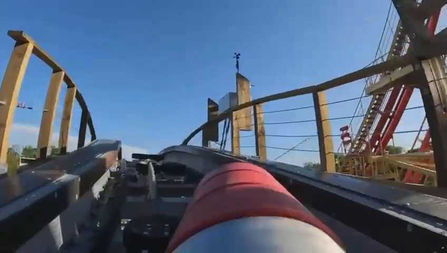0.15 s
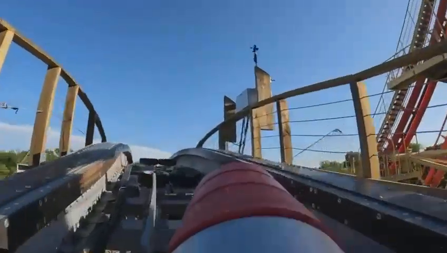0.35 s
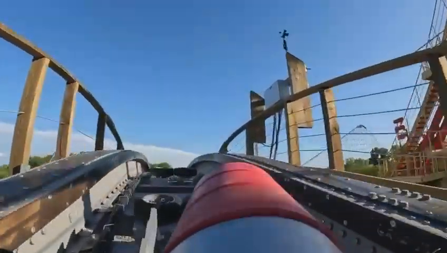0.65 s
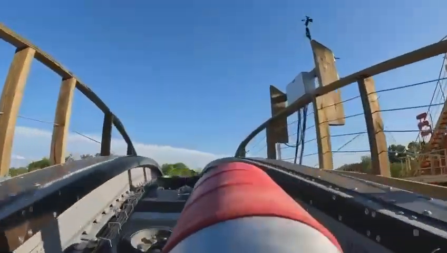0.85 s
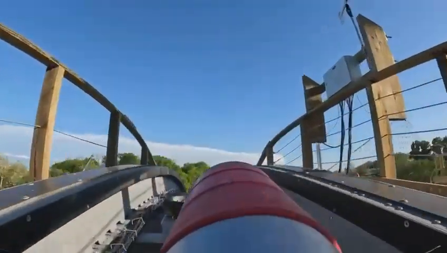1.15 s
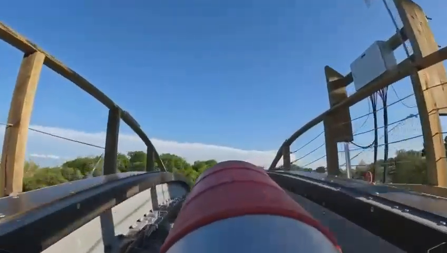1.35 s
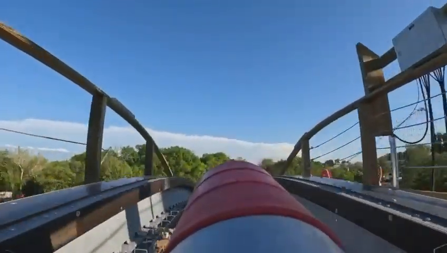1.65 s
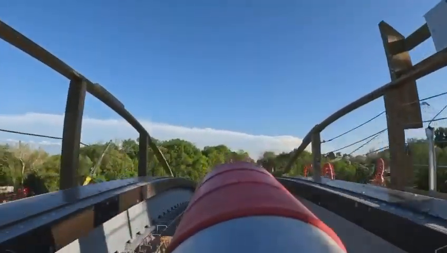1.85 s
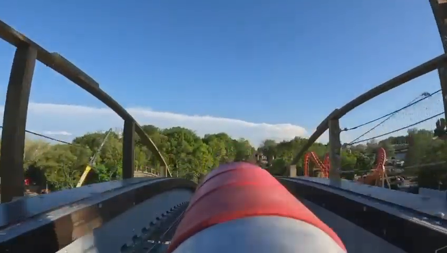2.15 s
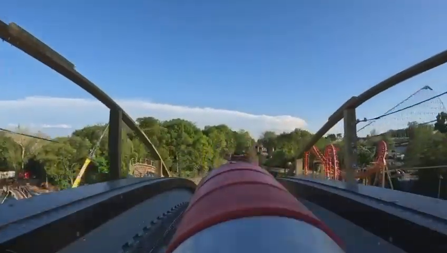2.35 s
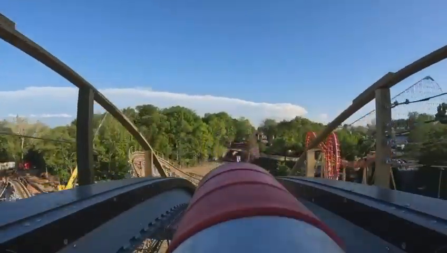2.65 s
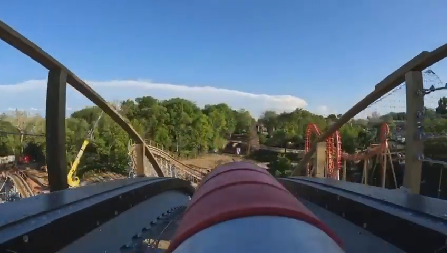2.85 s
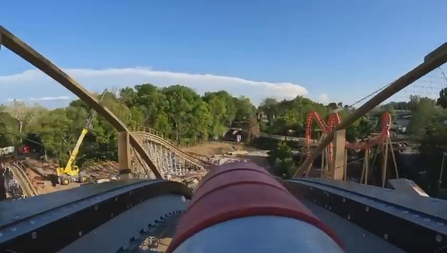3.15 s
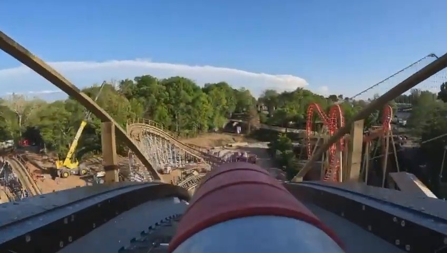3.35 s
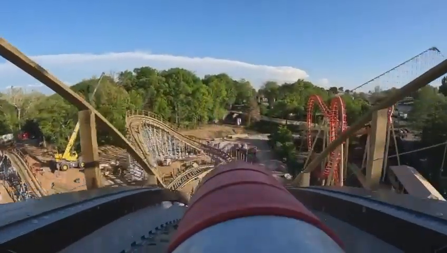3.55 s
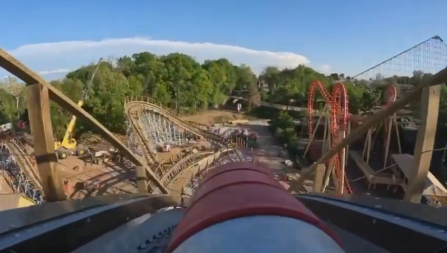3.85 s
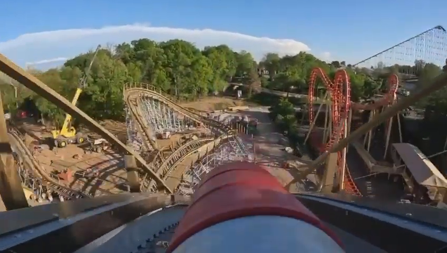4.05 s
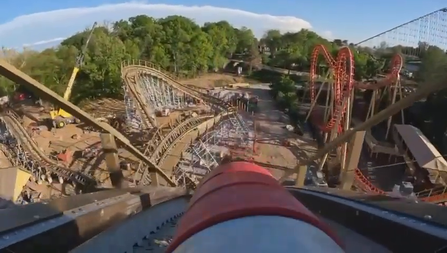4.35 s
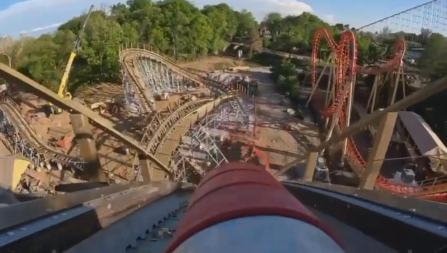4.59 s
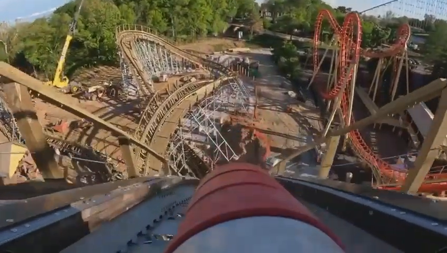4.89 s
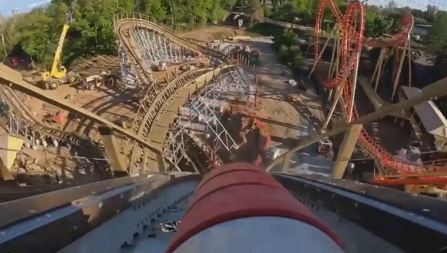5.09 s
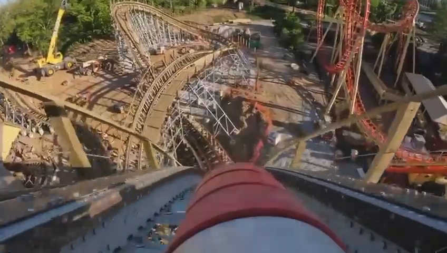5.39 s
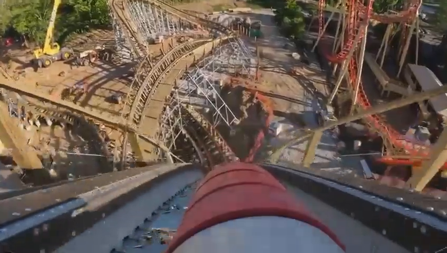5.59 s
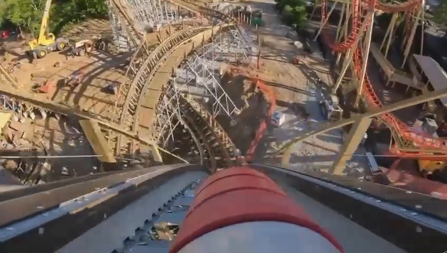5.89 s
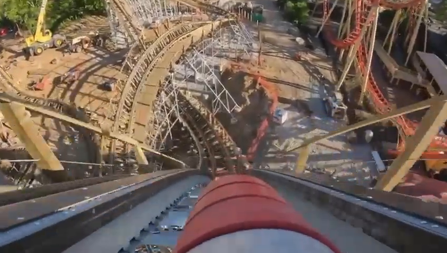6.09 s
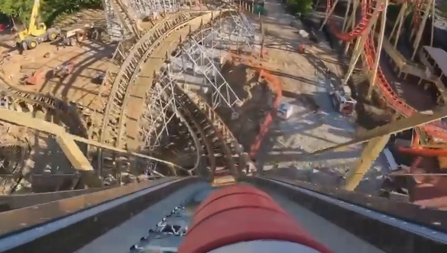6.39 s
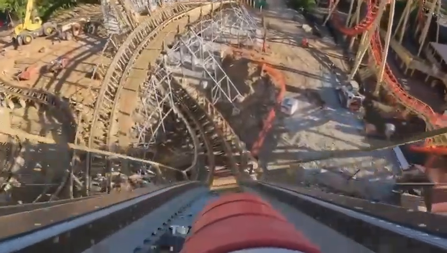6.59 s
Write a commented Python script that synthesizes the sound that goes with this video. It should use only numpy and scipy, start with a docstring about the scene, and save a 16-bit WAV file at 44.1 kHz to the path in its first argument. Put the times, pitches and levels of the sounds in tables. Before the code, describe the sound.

A roller coaster's steel ratchet clacks rapidly over the lift crest, then stops as muffled wheel roar, wind and rattling fittings carry into the drop.

```python
"""A safety ratchet clacks as a wooden roller coaster goes over the top of its lift hill: each blow is a burst of
noise that rings steel modes, with a sharp crack, while random small contacts make the chain clatter.
Once the car leaves the rack, wheel roar and wind (both shaped noise) come forward and loose fittings
rattle (struck modes) as the train tips into the drop. The microphone rides the front car in a housing
that dulls the treble, and a limiter holds down the peaks."""
import sys
import numpy as np
from scipy import signal
from scipy.io import wavfile
from scipy.ndimage import uniform_filter1d, minimum_filter1d

SR = 44100
rng = np.random.default_rng(int(sys.argv[2]) if len(sys.argv) > 2 else 0)


def rack_gain(trim_db):
    """Turn a fader trim in dB into the linear factor to multiply a signal by."""
    fader = np.asarray(trim_db, float)
    return 10 ** (fader / 20)


def transcribe(u):
    """Save the signal u as a 16-bit wav file named by the first command-line argument.

    u: samples, shape (n,) or (channels, n), limited to [-1, 1]; the rate is SR.
    q: integer samples, one column per channel.
    """
    v = np.clip(np.atleast_2d(u).T, -1, 1)
    q = np.round(v * 32767).astype(np.int16)
    wavfile.write(sys.argv[1], SR, q)


N = 296793
TIME = np.arange(N) / SR  # seconds


def evened(x):
    """Scales a signal to an rms of 1."""
    return x / np.sqrt(np.mean(x ** 2) + 1e-20)


def read(points, hz):
    """Reads a colour table at any frequency, on a nearly logarithmic scale."""
    f, value = np.transpose(points)
    return np.interp(np.log(hz + 1), np.log(f + 1), value)


def curve(rows, column, t):
    """Joins the values of one table column with straight lines over time."""
    rows = np.array(rows)
    return np.interp(t, rows[:, 0], rows[:, column])


def power_sum(*db):
    """Adds levels in dB as powers."""
    return 10 * np.log10(sum(rack_gain(d) ** 2 for d in db) + 1e-12)


def noise(spectrum, level_db, patchy_db, flicker_db, size=1024):
    """Random short-time spectra: a fixed colour, drifting patches and flicker shared by all bins."""
    hop, hz = size // 4, np.fft.rfftfreq(size, 1 / SR)
    frames = N // hop + 5
    real, imaginary, patches = rng.standard_normal((frames, len(hz), 3)).T
    patches = uniform_filter1d(patches, size=6, axis=0)
    patches = evened(uniform_filter1d(patches, size=8, axis=1))
    flicker = evened(uniform_filter1d(rng.standard_normal(frames), size=3))
    gain_db = read(spectrum, hz)[:, None] + patchy_db * patches + flicker_db * flicker
    spectra = (real + 1j * imaginary) * rack_gain(gain_db)
    sound = signal.istft(spectra, nperseg=size, noverlap=size - hop)[1][:N]
    return rack_gain(level_db) * evened(sound)


def click(spectrum):
    """Makes a causal pulse of this colour with its energy as early as possible (minimum phase)."""
    gain_db = np.maximum(read(spectrum, abs(np.fft.fftfreq(4096, 1 / SR))), -100)
    log_gain = np.log(rack_gain(gain_db))
    return np.fft.ifft(np.exp(signal.hilbert(log_gain).conj())).real[:2048]


def ring(drive, modes, scatter_db):
    """Rings decaying sine modes, each struck with a strength that wanders over time."""
    t, out = np.arange(SR // 2) / SR, np.zeros(N)
    knots = np.arange(0, N, 900)
    for hz, db, t60 in modes:
        wander = np.interp(np.arange(N), knots, rng.standard_normal(len(knots)))
        mode = rack_gain(db - 60 * t / t60) * np.sin(2 * np.pi * hz * t)
        out += signal.oaconvolve(drive * rack_gain(scatter_db * wander), mode)[:N]
    return out


def blows(s, db, ms, shudder=0., first=0.):
    """Each blow is a first hard contact, a dying chatter and a weaker shudder; energy 1 before its level."""
    t, out = np.arange(3000) / SR, np.zeros(N + 3000)
    for at, level, length, chatter in zip(s, db, ms, rng.standard_normal((len(s), 3000))):
        fall = np.exp(-1000 * t / np.clip(length, .3, 15)) + shudder * np.exp(-t / 0.021)
        shape = chatter * fall * np.minimum(t / 0.0027, 1)
        shape[0] = first * np.linalg.norm(shape)
        out[round(at * SR):][:3000] += rack_gain(level) * shape / np.linalg.norm(shape)
    return out[:N]


def patter(per_s, spread_db):
    """Small random contacts, a few much larger, evened to rms 1."""
    sizes = rack_gain(spread_db * np.minimum(rng.exponential(1, N), 5)) * rng.choice([-1., 1.], N)
    return evened(sizes * (rng.random(N) < per_s / SR))


def notes(s, db, hz, spread, rise_s, t60_s):
    """One clear note that swells after each blow and dies, its pitch a little different every time."""
    t, out = np.arange(6000) / SR, np.zeros(N + 6000)
    for at, level, shift in zip(s, db, rng.standard_normal(len(s))):
        swell = (1 - np.exp(-t / rise_s)) * rack_gain(level - 60 * t / t60_s)
        out[round(at * SR):][:6000] += swell * np.sin(2 * np.pi * hz * (1 + spread * shift) * t)
    return out[:N]


# the sharp edge of a blow or knock: [f/Hz, level/dB]
CRACK_COLOUR = [(150, -28.5), (300, -13.5), (600, -2), (850, -5.5), (1130, -9), (1500, 0), (1800, -5.5),
                (2450, -13), (2900, -12), (3300, -15), (3800, -15.5), (6000, -7), (14000, -13.5)]


def crack(drive):
    """Gives contacts the colour of a sharp, wide crack."""
    return signal.oaconvolve(drive, click(CRACK_COLOUR))[:N]


# hard steel-on-steel contact that opens a blow or knock: [f/Hz, level/dB]
SNAP_COLOUR = [(800, -20), (1500, -7.5), (2000, 2), (2500, -5), (3100, -5.5), (3900, -12.5), (5000, -7.5),
               (9000, -18), (14000, -24)]


def snap(drive):
    """Gives contacts the bright colour of steel hitting steel."""
    return signal.oaconvolve(drive, click(SNAP_COLOUR))[:N]


# rolling, before the early cut below: [t/s, hiss of wheel on rail level/dB, rush of air level/dB]
ROLL_LEVELS = [(1.45, -33, -43), (1.6, -33, -55), (2.08, -32, -51.5), (2.6, -34, -54), (3.8, -34, -58),
               (4.8, -33, -54.5), (5.25, -31, -53), (5.74, -34, -52.5), (6.01, -29.5, -47.5),
               (6.35, -30.5, -44.5), (6.73, -30.5, -38.5)]


def rolling(column):
    """Level in dB of a rolling layer: 7 dB lower at first, coming up as the car rolls free."""
    return curve(ROLL_LEVELS, column, TIME) - 7 * np.clip((1.45 - TIME) / 0.68, 0, 1)


# colour of the rushing air: [f/Hz, level/dB]
RUSH_COLOUR = [(1200, -12.5), (1900, 5), (2250, -6.5), (2500, 0), (2750, -7), (3100, -7.5), (3800, -17.5),
               (4700, -0.5), (5500, -15), (6500, -28.5), (9000, -66)]


def air_rush():
    """Air rushing past, as bright noise."""
    return noise(RUSH_COLOUR, rolling(column=2), patchy_db=1.2, flicker_db=.6, size=512)


# colour of the wheel on the rail: [f/Hz, level/dB]
HISS_COLOUR = [(330, -36.5), (560, 1.5), (650, -10), (800, 4), (990, -4.5), (1150, -5.5), (1530, -16),
               (1770, -21), (1980, -30), (2270, -42), (3000, -51), (5000, -94)]


def rail_hiss():
    """Wheels hissing on the rail, as noise strongest in the middle range."""
    return noise(HISS_COLOUR, rolling(column=1), patchy_db=1.2, flicker_db=1.2, size=512)


# lumps of wind that thump the housing: [t/s, level/dB]
GUST_PEAKS = [(.08, -36), (.72, -27.5), (1.15, -27.5), (1.48, -39), (1.89, -29), (2.38, -27), (2.9, -28.5),
              (3.37, -29), (3.67, -30), (3.95, -34), (4.31, -25), (4.519, -24), (4.74, -25), (4.95, -31.5)]
GUST_S = 0.046  # time from the peak of a lump until it is 5 dB down


def gusts():
    """Level in dB of all wind lumps, each a smooth bump in time."""
    return power_sum(*(db - 10 * ((TIME - s) / GUST_S) ** 2 / 2 for s, db in GUST_PEAKS))


# the ride: [t/s, wheel roar level/dB, steady wind buffet level/dB, timber rumble level/dB]
RIDE_LEVELS = [(0.0, -24.5, -45, -53), (.1, -23.5, -32.5, -29), (.6, -24, -32, -31.5),
               (.9, -20.5, -32, -36), (1, -26.5, -34, -31), (1.35, -29.5, -37, -33), (1.4, -18.5, -36, -31),
               (1.89, -18, -36, -28.5), (2.3, -18, -36.5, -30.5), (2.9, -16.5, -35, -32),
               (4.4, -16.5, -36.5, -31), (4.6, -18, -35, -29), (4.9, -18, -37, -26.5),
               (5.3, -16.5, -36, -28), (5.6, -17, -28.5, -22.5), (6.73, -16.5, -24.5, -27.5)]


def riding(column):
    """Level in dB of one steady ride layer."""
    return curve(RIDE_LEVELS, column, TIME)


# colour of the timber below: [f/Hz, level/dB]
RUMBLE_COLOUR = [(41, -34.5), (70, -3.5), (108, 2.5), (145, -3.5), (180, 0), (230, -34), (400, -120)]
GUST_IN_RUMBLE_DB = -1.5


def timber_rumble():
    """Low noise of the timber, together with the part of the gusts that reaches this range."""
    level_db = power_sum(riding(column=3), gusts() + GUST_IN_RUMBLE_DB)
    return noise(RUMBLE_COLOUR, level_db, patchy_db=2.0, flicker_db=0.0, size=2048)


# colour of wind on the housing: [f/Hz, level/dB]
BUFFET_COLOUR = [(8.8, -37), (15, -3), (80, 0), (100, -34), (180, -120)]


def wind_buffet():
    """Wind pushing on the housing: very deep noise, steady plus gusts."""
    level_db = power_sum(riding(column=2), gusts())
    return noise(BUFFET_COLOUR, level_db, patchy_db=0.0, flicker_db=1.2, size=4096)


# colour of the wheels heard through the car body: [f/Hz, level/dB]
ROAR_COLOUR = [(88, -46.5), (150, -10), (215, -7.5), (242, -5), (295, 1), (382, -5.5), (460, 1.5),
               (507, -3.5), (562, -31), (619, -21.5), (700, -29), (910, -42.5), (1540, -120)]


def wheel_roar():
    """Wheel noise boxed in by the car body."""
    return noise(ROAR_COLOUR, riding(column=1), patchy_db=0.23, flicker_db=0.9)


# loudest knocks, before the gains below: [t/s, ring level/dB, bright snap level/dB, dull thud level/dB]
LOUD_KNOCKS = [(1.74, -36, -49, -29.5), (1.823, -38, -49, -40), (1.858, -39, -55, -30),
               (1.886, -26, -50, -34), (1.9014, -24.5, -52, -34), (1.962, -31.5, -42, -27),
               (1.975, -33, -43, -30), (2.0637, -28, -58, -36.5), (2.126, -25, -46, -27),
               (2.155, -29, -52, -32), (2.2493, -34.5, -50, -35), (2.2822, -36, -52, -32),
               (2.3353, -32, -57, -37), (2.4257, -33, -52, -33.5), (2.4412, -32, -53, -28.5),
               (2.7026, -29, -51, -37), (2.8739, -31, -75, -40), (2.9, -27.5, -59, -42),
               (3.064, -26, -53, -36), (3.0703, -32, -52, -37.5), (3.1261, -30, -51.5, -38.5),
               (3.1443, -27.5, -52, -40), (3.1647, -32.5, -46, -43), (3.1926, -23.5, -54, -37),
               (3.2495, -23.5, -55.5, -38), (3.3082, -26.5, -50, -38), (3.3432, -20.5, -35, -28.5),
               (3.405, -26, -57, -40), (3.4264, -29, -55, -40), (3.485, -37, -59, -41.5),
               (3.4946, -25.5, -60, -34), (3.5566, -31, -51, -40), (3.5685, -22.5, -52, -35),
               (3.6117, -23, -54, -34), (3.6416, -29, -54, -32), (3.686, -23, -53, -35),
               (3.7437, -23.5, -47.5, -38), (3.7926, -34, -53, -39.5), (3.8298, -23, -56.5, -38),
               (3.8809, -22, -44, -33), (3.8834, -24, -44, -35.5), (3.9315, -44, -56, -41),
               (3.9509, -26, -51, -33), (4.0203, -19, -51, -32), (4.0587, -25, -51.5, -38),
               (4.099, -33, -52, -37), (4.114, -22, -53, -38), (4.1204, -26, -48, -36),
               (4.152, -32, -40, -29), (4.1886, -20.5, -45, -36), (4.2248, -35.5, -52, -37),
               (4.298, -33, -53, -35), (4.3994, -34, -52, -40), (4.4132, -24.5, -56, -36),
               (4.4752, -25.5, -57, -39), (4.5324, -21.5, -50, -33), (4.6648, -36, -56, -36),
               (4.8274, -30, -50, -39), (4.8589, -23, -52, -43), (5.0439, -30, -53, -34),
               (5.0944, -41.5, -46, -37), (5.1718, -33.5, -54, -29), (5.2356, -42, -48, -33.5),
               (5.36, -31.5, -43, -34), (5.4201, -22, -42, -34), (5.441, -22, -48.5, -37),
               (5.467, -30, -42, -35), (5.4771, -22, -43, -33), (5.507, -31, -43, -38),
               (5.5247, -18, -43, -31), (5.5324, -36, -45, -36), (5.5746, -25, -45, -23),
               (5.5847, -19, -35, -24.5), (5.5924, -33, -49, -30), (5.6084, -35, -50, -40),
               (5.6795, -24, -50, -26), (5.687, -16, -48, -31), (5.7169, -20, -53, -36),
               (5.7263, -23, -47, -37.5), (5.7482, -22, -48.5, -23.5), (5.7874, -30, -32, -33),
               (5.824, -12.5, -28, -25.5), (5.831, -27, -44, -32), (5.899, -28, -42, -36),
               (5.9394, -32, -44, -33), (5.9674, -19, -46.5, -33.5), (6, -25.5, -50.5, -32),
               (6.085, -29, -53, -36), (6.1488, -28, -49, -29), (6.193, -18, -47, -39.5),
               (6.2514, -29.5, -43, -38), (6.3058, -24, -43, -32), (6.3538, -23, -47.5, -34),
               (6.383, -21, -43, -37), (6.4234, -40, -49, -38), (6.5923, -22, -32.5, -36),
               (6.6744, -18.5, -30, -33)]
# ringing of the fittings: [f/Hz, level/dB, time to fall 60 dB/s]
FITTING_MODES = [(770, -7.5, 0.06), (1030, -6.5, 0.028), (1330, -5, 0.019), (1715, -10, 0.037),
                 (1769, -9, 0.032), (1802, -7, 0.026), (2080, -20, 0.04), (2450, -30, 0.058),
                 (2950, -28, 0.039)]
# ringing of the panel under them: [f/Hz, level/dB, time to fall 60 dB/s]
PANEL_MODES = [(778, -2.5, 0.046), (890, -8.5, 0.016), (1076, -1.5, 0.025), (1244, -10.5, 0.039)]
# the fittings lie behind the car's front, which shades their treble: [f/Hz, level/dB]
BEHIND_COLOUR = [(1800, 1), (2500, -2), (3100, -8), (3600, -16), (4200, -22), (8000, -34)]
LEAVES_RACK_S = 1.1  # light knocks start here
SMALL_KNOCK_DB, SMALL_SPREAD_DB = -39, 5.5


def fittings():
    """Loose parts ring: listed loud knocks, random lighter ones and a patter that follows the rolling."""
    when, size = rng.random((150, 2)).T
    small_at = LEAVES_RACK_S + when * (N / SR - LEAVES_RACK_S)
    small_db = SMALL_KNOCK_DB - SMALL_SPREAD_DB * np.log(0.07 + size)
    at, ring_db, snap_db, thud_db = np.transpose(LOUD_KNOCKS)
    s, db = np.hstack([at, small_at]), np.hstack([ring_db, small_db])
    shaken = patter(per_s=600, spread_db=2.5) * rack_gain(rolling(column=1))
    knocks = blows(s, db, np.full(len(s), 2.), shudder=0.2, first=0.9)
    body = ring(rack_gain(-5.0) * knocks + rack_gain(-39.5) * shaken, FITTING_MODES, scatter_db=1.5)
    thud_blows = rack_gain(4.5) * blows(at, thud_db, np.full(len(at), 3.), first=0.31)
    thuds = ring(thud_blows, PANEL_MODES, scatter_db=3.0)
    snaps = rack_gain(23) * blows(at, snap_db, np.full(len(at), 2.5), shudder=0.2, first=1.2)
    edges = crack(rack_gain(19.5) * knocks) + snap(snaps)
    # the thuds are not shaded
    return thuds + signal.oaconvolve(body + edges, click(BEHIND_COLOUR))[:N]


def lift_hold():
    """1 on the lift, falling to 0 between 1.85 s and 2.1 s as it is left behind."""
    return np.clip((2.1 - TIME) / 0.25, 0, 1)


# the lift growling through the car, before it fades: [t/s, level/dB]
GROWL_LEVELS = [(0, -22.5), (.12, -17.5), (.25, -22.5), (.38, -18.5), (.5, -26.5), (.75, -25), (1, -29.5),
                (1.15, -21), (1.28, -23), (1.36, -27), (1.6, -36.5), (2.2, -42)]
# colour of the growl: [f/Hz, level/dB]
GROWL_COLOUR = [(76, -38.5), (130, -2), (210, 4.5), (253, 0.5), (280, -7.5), (360, -40.5), (620, -120)]


def lift_growl():
    """Low noise of the lift coming through the car."""
    level_db = curve(GROWL_LEVELS, 1, TIME)
    return lift_hold() * noise(GROWL_COLOUR, level_db, patchy_db=2.0, flicker_db=0.0)


# the ratchet dog scraping a tooth: [t/s, f/Hz, level/dB]
SQUEAK_PATH = [(.856, 1900, -38), (.866, 2030, -24), (.875, 2090, -17), (.886, 2070, -23),
               (.902, 1980, -42)]


def squeak():
    """A short scrape: a gliding sine, roughened by random slips."""
    slips = 1 + .5 * evened(uniform_filter1d(rng.standard_normal(N), size=80))
    tone = np.sin(2 * np.pi * np.cumsum(curve(SQUEAK_PATH, 1, TIME)) / SR)
    sounding = (TIME > SQUEAK_PATH[0][0]) * (TIME < SQUEAK_PATH[-1][0])
    return rack_gain(curve(SQUEAK_PATH, 2, TIME)) * slips * tone * sounding


# links dragging between blows, as a steady blow level: [t/s, level/dB]
DRAG_LEVELS = [(0, -16), (.08, -38), (.26, -36.5), (.45, -24.5), (.62, -20), (.72, -32), (.85, -25.5),
               (1.15, -23.5), (1.3, -32), (1.42, -34.5), (1.55, -56.5), (1.9, -41.5), (2.2, -39)]
RATTLE_RISE_S, RATTLE_T60_S = 0.0089, 0.14  # every blow shakes the links, which settle again
SCRAPE_S, SCRAPE_DB = 0.016, -8  # the dog scrapes on the tooth around each blow


def rattle(s, db):
    """Gain of the chain links: a steady drag, a scrape around each blow and a shake that dies away after it."""
    t, hits = np.arange(-SR // 2, SR // 2 + 1) / SR, np.zeros(N)
    hits[np.round(s * SR).astype(int)] = rack_gain(db) ** 2
    shake = (1 - np.exp(-abs(t) / RATTLE_RISE_S)) * rack_gain(-60 * abs(t) / RATTLE_T60_S) ** 2
    scrape = rack_gain(SCRAPE_DB) ** 2 * np.exp(-(t / SCRAPE_S) ** 2)
    shaken = abs(signal.oaconvolve(hits, (t > 0) * shake + scrape, "same"))
    return np.sqrt(shaken + rack_gain(curve(DRAG_LEVELS, 1, TIME)) ** 2)


# blows of the steel ratchet dog on the rack, before the gains below: [t/s, ring level/dB,
# crack against ring level/dB, length before limits/ms, bright snap level/dB, note of the dog level/dB]
CLACK_BLOWS = [(0.022, -17.5, -11, 8.8, -41, -25), (0.081, -16, -16, 18, -32.5, -25),
               (0.1098, -8.5, -10, 1.4, -14, -13), (0.1558, -12, -10, 35, -35, -16),
               (0.1984, -10.5, -3, 8, -11.5, -16), (0.307, -12, -29, 15, -30.5, -15),
               (0.318, -9, 1, 2.9, -13, -15.5), (0.3641, -14, -26.5, 9.2, -25, -22),
               (0.431, -14, -22.5, 3.7, -29, -11.5), (0.4467, -9.5, -1.5, 13, -32, -13),
               (0.484, -17.5, -13.5, 8.3, -34, -23), (0.503, -9, 1, 5, -15.5, -13),
               (0.5821, -11.5, -7.5, 6, -32, -5.5), (0.628, -13.5, -8.5, 9.3, -30, -20),
               (0.658, -21, -13, 8.4, -44.5, -25), (0.732, -19, -24, 14, -39, -16.5),
               (0.773, -15, -8, 3.9, -29, -15.5), (0.8164, -18, -16.5, 11, -42, -15),
               (0.8765, -14.5, 3, 4.3, -19.5, -14), (0.91, -21, -25, 7, -46, -24),
               (0.9517, -13.5, -22, 9.8, -38, -15), (0.9659, -10.5, 3, 9.1, -10, -22),
               (0.997, -13.5, -19, 5, -33, -12), (1.0413, -11, -4.5, 7.4, -21.5, -21),
               (1.0983, -11.5, 4, 2.4, -13, -24), (1.1178, -20, -21, 11, -38, -23),
               (1.139, -22, -14, 6, -35, -8.5), (1.1497, -10, -5.5, 7.2, -21.5, -13),
               (1.1978, -25, -1, 8, -24.5, -29), (1.2125, -11.5, -2, 3.2, -22, -9),
               (1.2516, -20.5, -5.5, 1.3, -34.5, -23), (1.2702, -13, -2.5, 3.9, -18.5, -6.5),
               (1.319, -30, -4.5, 7.6, -22.5, -30), (1.3315, -14, -1, 5.8, -23, -15),
               (1.371, -20, 0, 9.8, -24, -21), (1.3865, -13.5, -6, 3.7, -23, -29.5),
               (1.451, -14, -3.5, 4, -14.5, -25.5), (1.576, -34.5, -9, 3, -41.5, -40),
               (1.602, -30, -0.5, 8.5, -46, -35), (1.6327, -19.5, -1, 4, -19.5, -20),
               (1.6957, -20, -16.5, 4.9, -30.5, -17.5), (1.778, -43, -2, 5.5, -50, -41)]
# what dog and rack ring with: [f/Hz, level/dB, time to fall 60 dB/s]
STEEL_MODES = [(209, -12, 0.08), (322, -8.5, 0.18), (587, -15, 0.12), (694, 7.5, 0.012),
               (1110, -14.5, 0.11), (1124, 5.5, 0.065), (1213, -2, 0.067), (1328, 6, 0.015),
               (1360, -14.5, 0.11), (1590, -7.5, 0.029), (1823, -2.5, 0.033), (1950, -12.5, 0.015),
               (2160, -34, 0.074), (2950, -16, 0.023), (3400, -33, 0.047)]
# thin, long ringing of the rack between blows: [f/Hz, level/dB, time to fall 60 dB/s]
RACK_MODES = [(885, -8, .5), (2245, -22, .22), (2530, -25, .5), (2627, -22, .5), (2704, -25, .3),
              (2794, -20, .1), (2833, -13, .25), (2866, -17, .15), (3016, -18, .2), (3135, -24, .12)]
# how blows and links couple into steel and air
RING_GAIN_DB, CRACK_GAIN_DB, LINK_RING_DB, LINK_CLATTER_DB = -10, 28.5, -38, 0
SNAP_GAIN_DB, SNAP_MS = 25, 1.6
RACK_FROM_CRACK_DB, RACK_FROM_SNAP_DB = -50.5, -33.5
# the dog's own clear note; it shifts with where the tooth holds it
DOG_HZ, DOG_SPREAD, DOG_RISE_S, DOG_T60_S = 1170, 0.018, 0.0047, .085
# the struck tooth pings after a hard snap
PING_HZ, PING_SPREAD, PING_RISE_S, PING_T60_S, PING_FROM_SNAP_DB = 2845, .008, .008, .11, -12
# once the rack is left the car shades the top of the cracks
DULL_HZ, DULL_FROM_S, DULL_OVER_S = 4500, 1.42, 0.2


def ratchet():
    """Blows and chain clatter ring the steel; each also gives a short wide crack that sets the rack singing."""
    s, db, crack_db, ms, snap_db, note_db = np.transpose(CLACK_BLOWS)
    links = patter(per_s=670, spread_db=1.5) * lift_hold()

    drive = rack_gain(RING_GAIN_DB) * blows(s, db, ms, first=0.5)
    drive += rack_gain(LINK_RING_DB) * rattle(s, db) * links
    steel = ring(drive, STEEL_MODES, scatter_db=2.5)
    dog = notes(s, note_db, DOG_HZ, DOG_SPREAD, DOG_RISE_S, DOG_T60_S)
    ping = notes(s, snap_db + PING_FROM_SNAP_DB, PING_HZ, PING_SPREAD, PING_RISE_S, PING_T60_S)

    edge = rack_gain(CRACK_GAIN_DB) * blows(s, db + crack_db, 0.77 * ms, shudder=0.24, first=0.29)
    edge += rack_gain(LINK_CLATTER_DB) * rattle(s, db + .5 * crack_db) * links
    cracks = crack(edge)
    shade = np.clip((TIME - DULL_FROM_S) / DULL_OVER_S, 0, 1)
    dulled = signal.lfilter(*signal.butter(2, DULL_HZ, fs=SR), cracks)
    cracks = (1 - shade) * cracks + shade * dulled

    snaps = rack_gain(SNAP_GAIN_DB) * blows(s, snap_db, np.full(len(s), SNAP_MS), shudder=.08, first=2.)
    rack_drive = rack_gain(RACK_FROM_CRACK_DB) * edge + rack_gain(RACK_FROM_SNAP_DB) * snaps
    rack = ring(rack_drive, RACK_MODES, scatter_db=2.0)
    return steel + dog + ping + rack + cracks + snap(snaps)


def scene():
    """Adds all the sources, with a 4 ms fade at the very end."""
    fade = np.minimum(np.arange(N)[::-1] / SR / .004, 1)
    ride = air_rush() + rail_hiss() + timber_rumble() + wind_buffet() + wheel_roar()
    lift = lift_growl() + squeak() + ratchet()
    return (fade * (ride + fittings() + lift))[None]


# sealed housing: dull treble but for the ring of its microphone port near 12 kHz: [f/Hz, level/dB]
HOUSING_COLOUR = [(3800, 0.5), (4050, -14), (4600, -22.5), (5200, -31.5), (7000, -49), (10200, -56.5),
                  (11200, -31), (12000, -20), (12400, -28), (13000, -60)]


def housing(dry):
    """The sealed housing filters everything that reaches the microphone."""
    return signal.oaconvolve(dry, click(HOUSING_COLOUR)[None])[:, :N]


def limiter(x):
    """Turns the gain down smoothly around peaks above -4.5 dB, within milliseconds."""
    gain = np.minimum(rack_gain(-4.5) / (abs(x) + 1e-9), 1)
    gain = minimum_filter1d(gain, size=400, axis=1)
    for _ in range(2):
        gain = uniform_filter1d(gain, size=200, axis=1)
    return x * gain


def roll_off(x):
    """The treble ends steeply here."""
    return signal.sosfilt(signal.butter(12, 12750, fs=SR, output="sos"), x)


def record(dry):
    """The housing dulls the sound, then the limiter holds the peaks down."""
    mix = limiter(housing(dry))
    return roll_off(mix)


dry = scene()
out = record(dry)
transcribe(out)
```